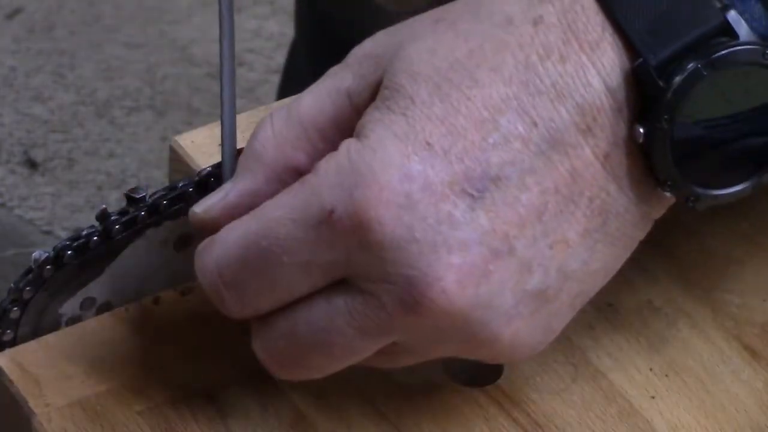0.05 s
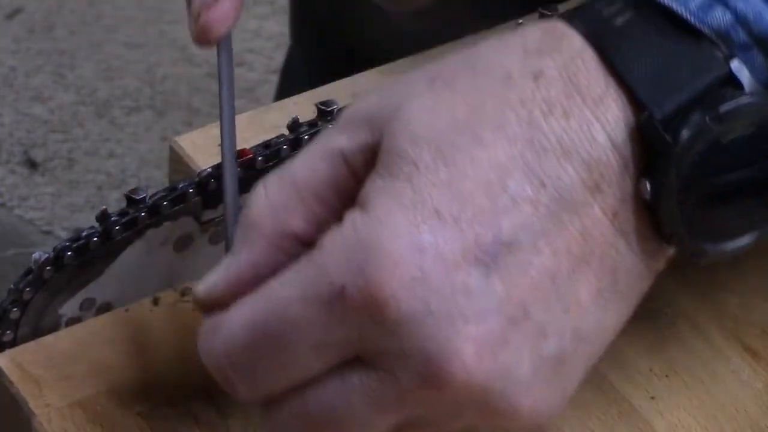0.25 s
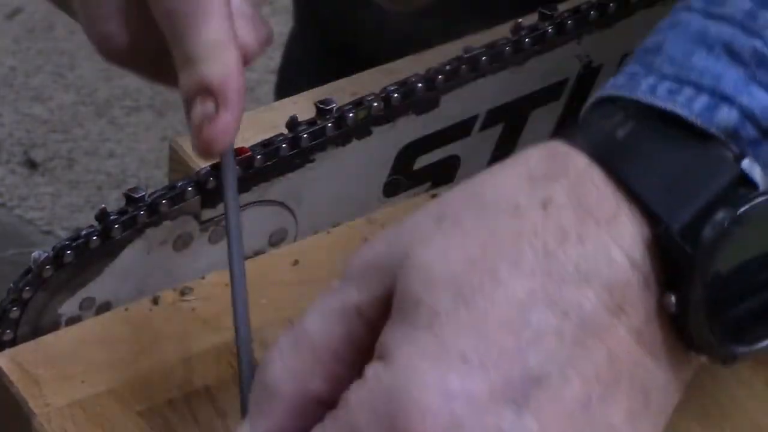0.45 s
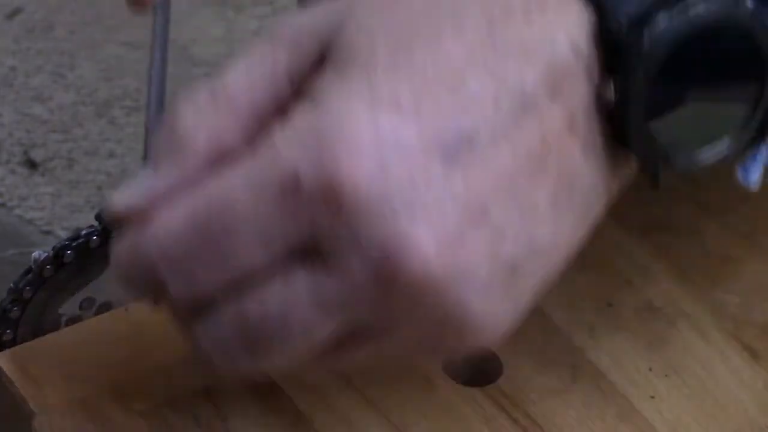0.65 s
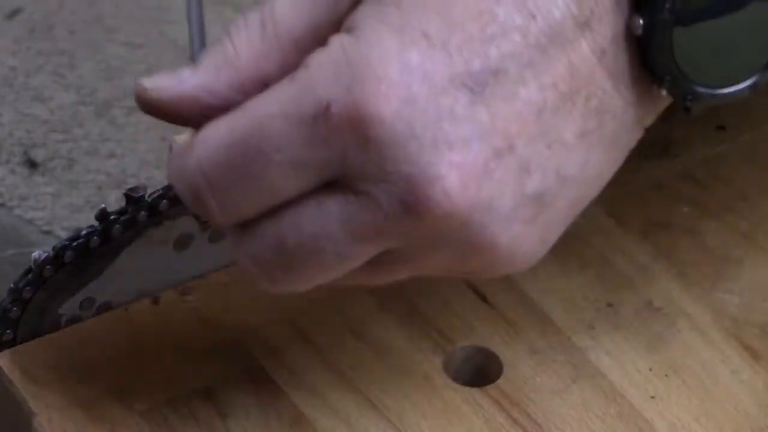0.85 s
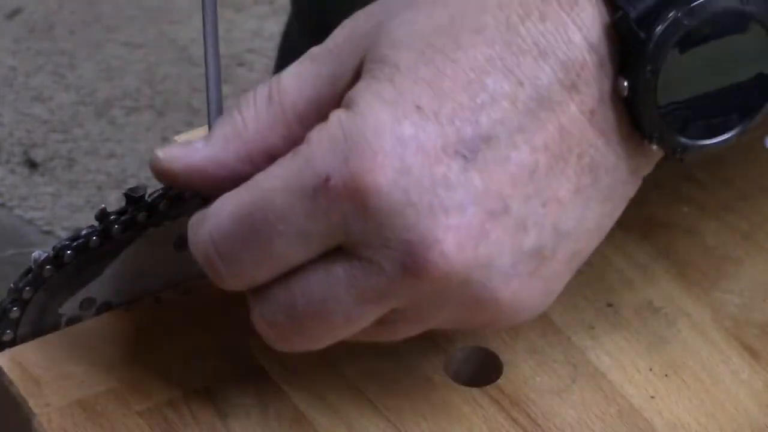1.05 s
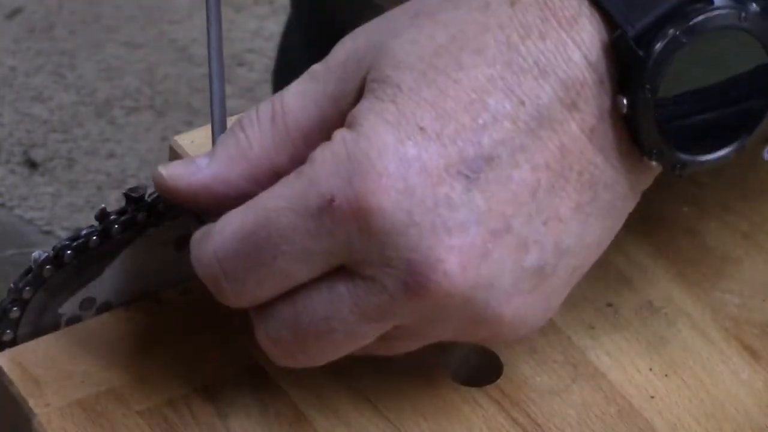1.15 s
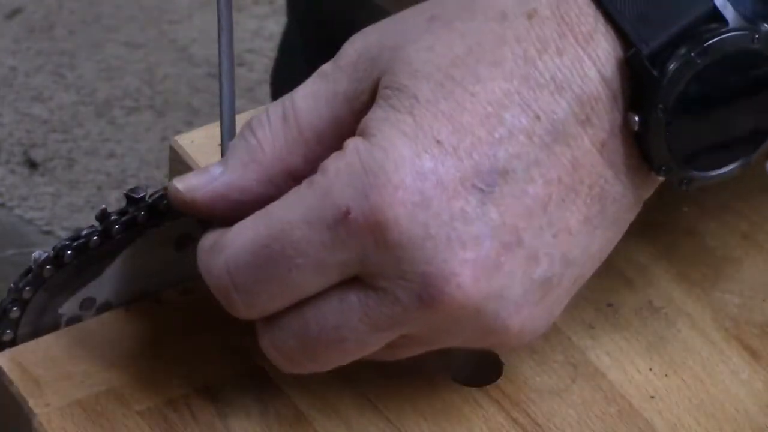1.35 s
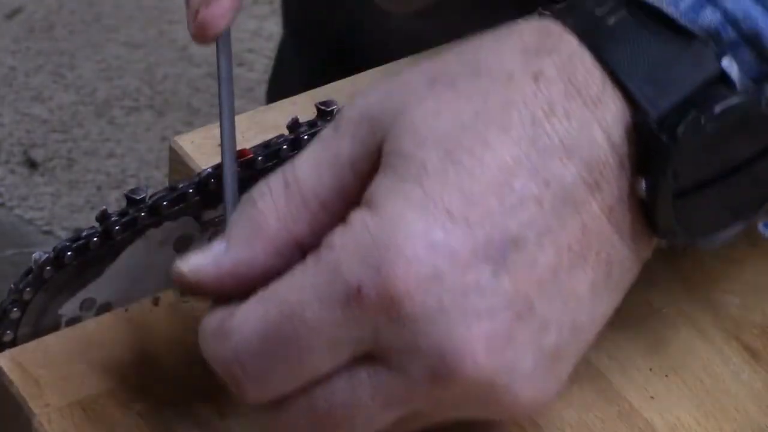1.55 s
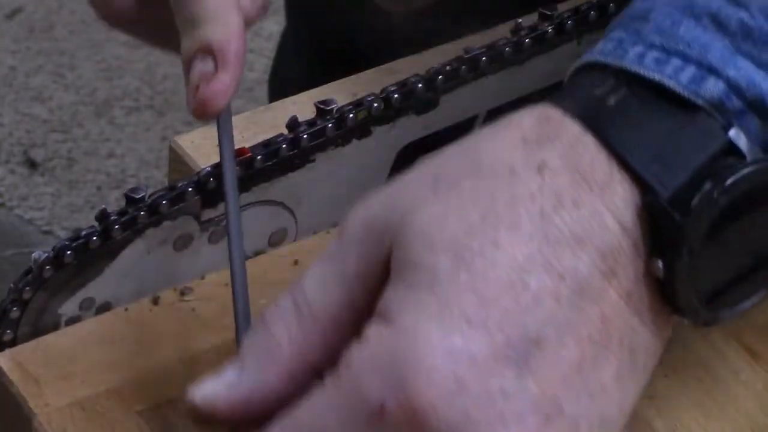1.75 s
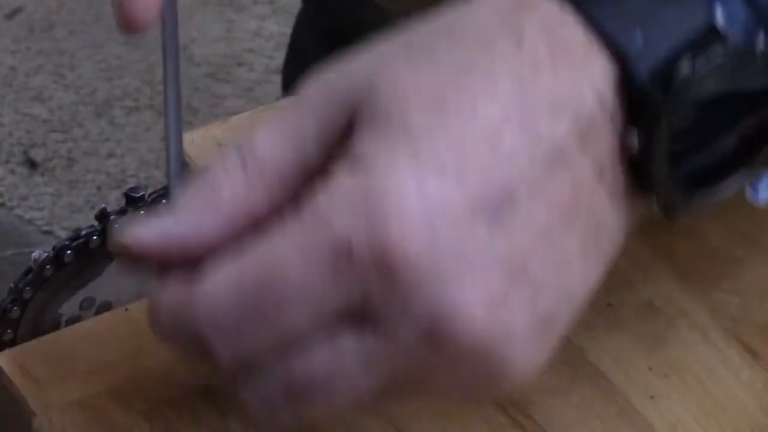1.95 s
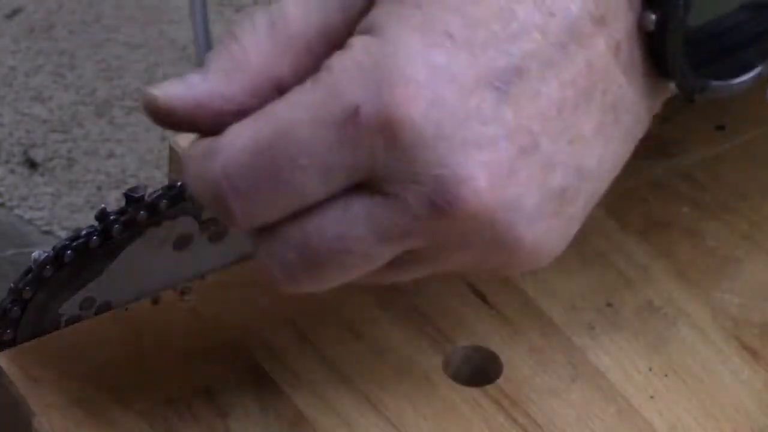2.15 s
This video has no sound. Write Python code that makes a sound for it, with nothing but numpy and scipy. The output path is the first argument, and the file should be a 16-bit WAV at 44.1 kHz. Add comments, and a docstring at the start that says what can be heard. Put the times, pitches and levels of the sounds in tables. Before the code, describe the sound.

A round file rasps across a saw chain tooth in two gritty pushes, each under half a second, with small steel clicks before each and a woody bench resonance; close microphone in a small room.

```python
"""Faint room tone and a light slide of steel on steel, then taps: a round file meets a cutter tooth of a saw chain
clamped on a wooden bench, indoors. Two pushes follow, with lighter sliding and more taps between them; uneven tooth
contacts excite bright steel resonances and shake the bar and bench. After the second push the file is drawn back
and its evenly passing teeth whistle faintly. A small room answers with decaying noise."""
import sys
import numpy as np
from scipy import signal
from scipy.fft import rfft, irfft, next_fast_len
from scipy.io import wavfile
from scipy.ndimage import uniform_filter1d, minimum_filter1d, map_coordinates

SR = 44100
rng = np.random.default_rng(int(sys.argv[2]) if len(sys.argv) > 2 else 0)


def magnitude_from_level(level_db):
    """Linear magnitude for a level in decibels (20 dB per decade)."""
    exponent = np.asarray(level_db, float) / 20
    return 10 ** exponent


def master(y):
    """Save y as 16-bit WAV."""
    cut = np.clip(np.atleast_2d(y).T, -1, 1)
    pcm = np.round(cut * 32767)  # scale
    wavfile.write(sys.argv[1], SR, pcm.astype(np.int16))


N = 97020


def unit(x):
    """Scale to rms 1."""
    return x / np.sqrt(np.mean(x ** 2) + 1e-20)


def along(points, hz):
    """Interpolate (hz, value) points on a log frequency axis."""
    f, v = np.transpose(points)
    return np.interp(np.log(hz + 1), np.log(f + 1), v)


def track(rows, outside):
    """One value per sample for each column after the time."""
    time_s, *columns = np.transpose(rows)
    return [np.interp(np.arange(N) / SR, time_s, c, outside, outside) for c in columns]


def wobble(knots_per_s):
    """A smooth random curve through normally distributed knots."""
    knots = rng.standard_normal(int(N * knots_per_s / SR) + 4)
    return map_coordinates(knots, [np.arange(N) * knots_per_s / SR])


def filtered(x, response):
    """Multiply the zero-padded spectrum of x by a response of frequency."""
    m = 2 * next_fast_len(N // 2 + SR // 4)
    return irfft(rfft(x, m) * response(np.fft.rfftfreq(m, 1 / SR)), m)[:N]


def causal(points):
    """Minimum-phase response with the given (hz, db) spectrum, by folding the cepstrum."""
    def response(hz):
        cepstrum = irfft(np.log(magnitude_from_level(along(points, hz)) + 1e-6))
        half = len(cepstrum) // 2
        cepstrum[1:half] *= 2
        cepstrum[half + 1:] = 0
        return np.exp(rfft(cepstrum))
    return response


def resonance(f, centre_hz, width_hz):
    """Second-order bandpass with gain 1 at its centre."""
    damping = 1j * f * width_hz
    return damping / (centre_hz * centre_hz - f * f + damping)


def teeth(contacts_per_s):
    """Irregular tooth contacts of random sign and scattered size, rms 1."""
    scatter_db = 4
    hit = rng.random(N) < contacts_per_s / SR
    size = magnitude_from_level(scatter_db * rng.standard_normal(N))
    sign = np.sign(rng.standard_normal(N))
    return unit(hit * sign * size)


def played(drive, gain, response):
    """Contacts under an envelope through a body whose steady answer has rms 1."""
    return filtered(drive * gain, response) / np.std(filtered(drive, response))


def hush():
    """Steady room tone: shaped noise, wavering a little."""
    level_db, waver_db = -40, 0.68
    # room tone spectrum: pitch_hz, relative_db_per_hz
    tone_spectrum = [(15, -66), (25, -60), (156, -9), (179, -21), (210, -15), (234, 0), (323, -13.5),
                     (497, -12.5), (744, -15.5), (807, -8.5), (1090, -19), (11000, -50), (15600, -53)]
    noise = filtered(rng.standard_normal(N), lambda hz: magnitude_from_level(along(tone_spectrum, hz)))
    return magnitude_from_level(level_db + waver_db * wobble(2.33)) * unit(noise)


def slides():
    """Light sliding: sparse contacts sound the file and stir the bench a little."""
    slide_trim_db, bench_trim_db = -3.5, 0.5
    # slides around the pushes: time_s, untrimmed_level_db, untrimmed_bench_over_level_db
    strokes = [
        [(0.0, -60, 3), (0.052, -34, 2), (0.13, -62, 17), (0.142, -39, 1), (0.158, -60, 14), (0.17, -39, 14)],
        [(1.235, -23.5, -19), (1.265, -35, -3.5), (1.337, -37, 3.5), (1.417, -46.5, 2), (1.431, -51, 5),
         (1.474, -47, 15)],
    ]
    # sliding steel spectrum: pitch_hz, relative_db_per_hz
    slide_spectrum = [(500, -31), (800, -0.5), (1100, 2.5), (1500, 5), (2000, -2.5), (2500, -13),
                      (3500, -10.5), (4300, -26), (9000, -33), (14000, -60), (20000, -84)]
    # bench under a light touch: pitch_hz, relative_db_per_hz
    nudge_spectrum = [(100, -52), (170, -9), (250, 6), (380, 2.5), (500, -3), (700, -4), (1200, -30),
                      (4000, -90)]
    drive, slide_gain, bench_gain = teeth(3000), 0, 0
    for rows in strokes:
        level_db, over_db = track(rows, -99)
        slide_gain = slide_gain + magnitude_from_level(level_db + slide_trim_db)
        bench_gain = bench_gain + magnitude_from_level(level_db + over_db + bench_trim_db)
    scrape = played(drive, slide_gain, causal(slide_spectrum))
    return scrape + played(drive, bench_gain, causal(nudge_spectrum))


def taps():
    """Each tap rings the same short steel modes; a longer contact dulls and softens it."""
    # file taps or catches the tooth: start_s, peak_db (before the soft onset), contact_s
    hits = [(0.056, -34, .0002), (0.177, -29, .0002), (0.2, -27, .0001), (1.2303, -17, .00006),
            (1.2325, -14, .0003), (1.2372, -21, .0003), (1.246, -19, .0006), (1.2545, -25, .0005),
            (1.261, -25, .0005), (1.478, -25, .00015)]
    # steel modes: pitch_hz, relative_db (before scatter and dulling), t60_s
    modes = [(1080, -1, .015), (1300, 0, .012), (1550, 0, .018), (1900, -3, .012), (2400, -7, .008),
             (2900, -8, .008), (3600, -8, .012), (4900, -15, .01), (6300, -21, .008), (8000, -19, .008),
             (9800, -18, .008), (12200, -25, .006)]
    scatter_db = 0.74
    out, t = np.zeros(N + SR), np.arange(SR // 10) / SR
    for start_s, peak_db, contact_s in hits:
        ring = 0
        for hz, mode_db, t60_s in modes:
            decay = magnitude_from_level(mode_db + rng.normal(0, scatter_db) - 60 * t / t60_s)
            tone = np.sin(2 * np.pi * (hz * t + rng.random()))
            ring = ring + decay * tone / (1 + (hz * contact_s) ** 2)
        onset = 1 - np.exp(-t / contact_s)
        out[round(start_s * SR):][:len(t)] += magnitude_from_level(peak_db) * ring / np.abs(ring).max() * onset
    return out[:N]


def steel(points):
    """A broad spectrum with the narrow rings of file and chain on it."""
    # rings: pitch_hz, width_hz, db_over_broad_bite
    rings = [(1507, 22, -2.5), (1734, 27, 10.5), (1892, 29, 9), (1957, 42, 4.5), (2153, 46, 3.5),
             (2380, 40, -0.5), (3000, 29, 5.5), (3225, 40, 7.5), (3790, 54, 0.5), (4780, 50, -0.5),
             (5240, 150, 6), (5850, 60, 4), (6780, 92, -5), (7950, 160, 0), (8960, 130, 1.5),
             (11370, 200, -1)]
    return lambda f: causal(points)(f) * (1 + sum(magnitude_from_level(db) * resonance(f, c, w) for c, w, db in rings))


def bench(upper):
    """Summed resonances of bar and bench, the low or the upper group; wood passes no treble."""
    split_hz, top_hz = 520, 2310
    # resonance centres: pitch_hz
    centres = [145, 248, 273, 335, 398, 450, 558, 619, 662, 760, 855, 1050, 1088, 1130, 1288, 1450]
    # the same resonances: width_hz, relative_db
    resonances = [(19.8, -28), (30, -11.5), (23.5, -7.5), (58, -8.5), (33.4, -4.5), (23.1, -2.5),
                  (26, -12.5), (22.8, -5.5), (18, -1), (114, -16), (44, -11.5), (57, -10.5), (21.2, -8),
                  (53, -14.5), (32.8, -11), (230, -20)]

    def response(f):
        total = 0
        for k, (centre_hz, (width_hz, db)) in enumerate(zip(centres, resonances)):
            if (centre_hz > split_hz) == upper:
                total = total + (-1) ** k * magnitude_from_level(db) * resonance(f, centre_hz, width_hz)
        return total / (1 + 1j * f / top_hz) ** 2
    return response


def pushes():
    """The same biting teeth sound as bright rasp and as the boom of bar and bench."""
    # each push: time_s, treble_bite_db, mid_bite_db, low_bench_db, upper_bench_db
    strokes = [
        [(.172, -54, -38.5, -31, -27.5), (.194, -57, -39, -28, -36), (.201, -40.5, -33.5, -24, -20),
         (.23, -38.5, -23.5, -13.5, -17.5), (.29, -35.5, -24, -15, -15.5), (.36, -36, -22.5, -13.5, -17.5),
         (.42, -30.5, -21.5, -11, -12), (.48, -31, -21, -11.5, -15.5), (.525, -41, -28.5, -21, -16.5),
         (.545, -38.5, -35, -23.5, -19), (.565, -44, -34, -34, -31)],
        [(1.476, -48, -39, -22, -22.5), (1.51, -48.5, -33, -23.5, -25.5), (1.56, -35.5, -25, -12.5, -16),
         (1.6, -33.5, -24.5, -15.5, -18.5), (1.63, -34.5, -20.5, -16.5, -18.5),
         (1.68, -38.5, -23.5, -10.5, -18.5), (1.75, -34.5, -23.5, -12.5, -13), (1.79, -31.5, -22.5, -13.5, -13),
         (1.84, -34, -25, -14.5, -21.5), (1.862, -37, -29, -12.5, -16), (1.875, -46, -36, -31, -44)],
    ]
    # treble of the bite: pitch_hz, relative_db_per_hz
    treble_spectrum = [(2400, -27), (3300, -1.5), (4000, 1.5), (5200, -11), (5700, -9), (7300, -12),
                       (7900, -11), (9000, -12.5), (10300, -16), (11500, -18.5), (12400, -27.5),
                       (14300, -31), (15600, -31)]
    # middle of the bite: pitch_hz, relative_db_per_hz
    mid_spectrum = [(800, -44), (1200, -6), (1500, -2), (2000, 2), (2500, 3), (3200, -6), (3900, -31.5),
                    (5500, -72), (9000, -101)]
    chatter_db = 1.0
    drive = teeth(3500) * magnitude_from_level(chatter_db * wobble(44.43))
    gains = sum(magnitude_from_level(np.array(track(rows, -140))) for rows in strokes)
    bodies = [steel(treble_spectrum), steel(mid_spectrum), bench(False), bench(True)]
    treble, mid, low, upper = [played(drive, g, body) for g, body in zip(gains, bodies)]
    return treble + mid, low + upper


def whistle():
    """Teeth skim past evenly on the way back; the pitch falls as the hand slows."""
    # drawing back: time_s, teeth_passing_hz, level_db
    draw = [(1.88, 2405, -80), (1.94, 2410, -75), (1.98, 2310, -72), (2.02, 2110, -75), (2.045, 1880, -75),
            (2.055, 1800, -90)]
    # harmonics of the tooth rate: multiple, relative_db
    partials = [(3, -4), (4, -7), (5, 0)]
    flutter_db = 3.5
    hz, level_db = track(draw, -140)
    phase = 2 * np.pi * np.cumsum(hz) / SR
    tones = sum(magnitude_from_level(level_db + db + flutter_db * wobble(60)) * np.sin(k * phase) for k, db in partials)
    return np.sqrt(2) * tones  # levels are rms


def room(x):
    """Delayed noise tail in which each frequency dies at its own speed."""
    first_wall_s = .004
    # reverberation: pitch_hz, t60_s
    reverb = [(150, 0.53), (500, 0.43), (2000, 0.58), (6000, 0.63), (14000, 0.11)]
    hz, t, z = signal.stft(rng.standard_normal(SR), SR, nperseg=256)
    decay = magnitude_from_level(-60 * t / along(reverb, hz)[:, None])
    tail = signal.istft(z * decay, SR, nperseg=256)[1]
    delayed = np.pad(x, (round(first_wall_s * SR), 0))
    return signal.fftconvolve(delayed, tail / np.linalg.norm(tail))[:N]


def scene():
    """File, tooth and bench with the room's answer, the whistle and the room tone."""
    steel_room_db, bench_room_db = -10, -2
    bite, boom = pushes()
    near = bite + slides() + taps()
    answer = room(magnitude_from_level(steel_room_db) * near + magnitude_from_level(bench_room_db) * boom)
    return (near + boom + answer + whistle() + hush())[None]


def top_cut(x):
    """Nothing passes above the cut-off."""
    return signal.sosfilt(signal.butter(12, 15760, fs=SR, output="sos"), x)


def record(dry):
    """The recorder cuts the deep bass, limits the peaks and adds its own faint rumble."""
    low_cut_hz, rumble_db, ceiling, hold_s = 125, -67, .96, .006
    # microphone's own bass noise: pitch_hz, relative_db_per_hz
    rumble_spectrum = [(20, -21.5), (45, -19), (70, -17.5), (100, 0), (140, -24)]
    cut = filtered(dry[0], lambda f: (1j * f / (low_cut_hz + 1j * f)) ** 4)
    noise = filtered(rng.standard_normal(N), lambda hz: magnitude_from_level(along(rumble_spectrum, hz)) * (hz < 140))
    rumble = magnitude_from_level(rumble_db) * unit(noise)
    hold = round(hold_s * SR)
    needed = np.minimum(1, ceiling / (np.abs(cut) + 1e-9))
    gain = uniform_filter1d(minimum_filter1d(needed, size=2 * hold), size=hold)
    return top_cut((gain * cut + rumble)[None])


dry = scene()
out = record(dry)
master(out)
```